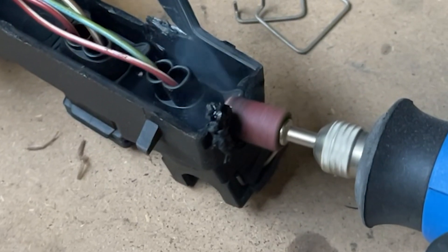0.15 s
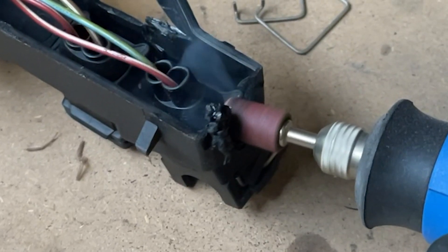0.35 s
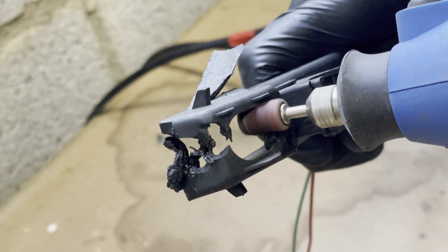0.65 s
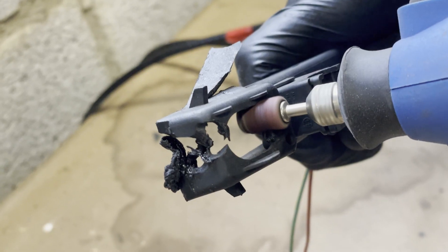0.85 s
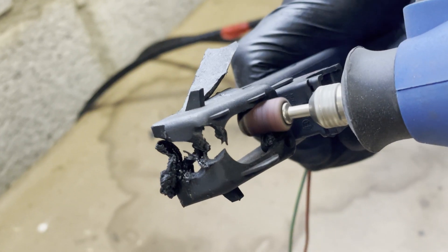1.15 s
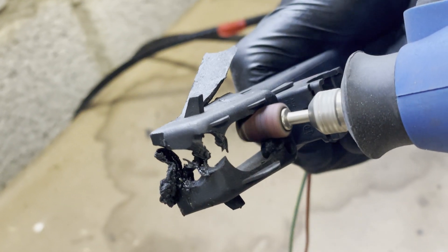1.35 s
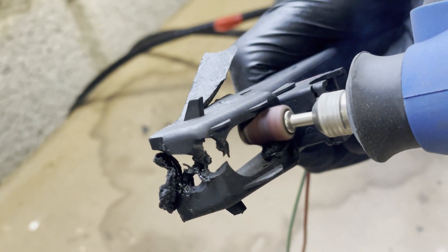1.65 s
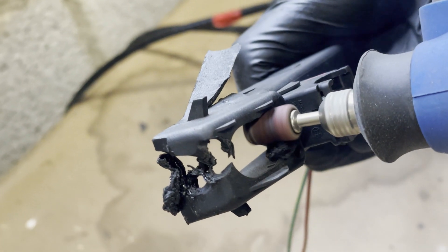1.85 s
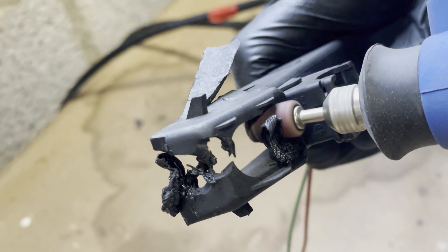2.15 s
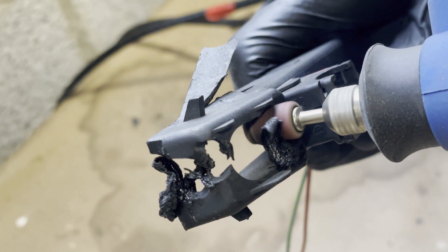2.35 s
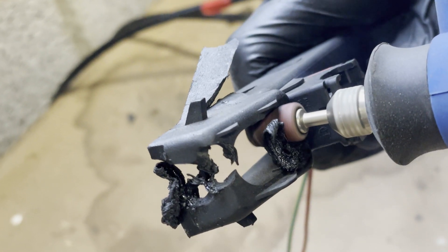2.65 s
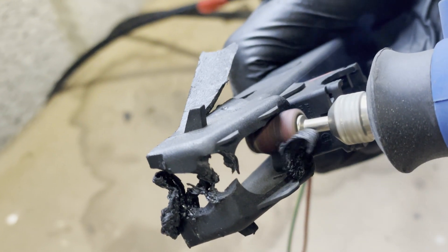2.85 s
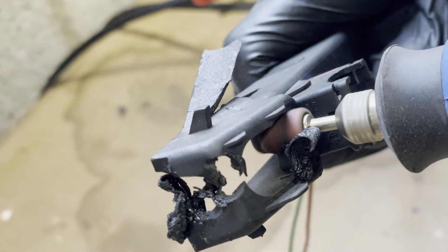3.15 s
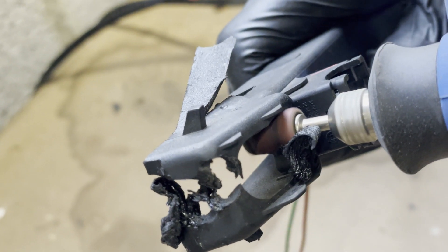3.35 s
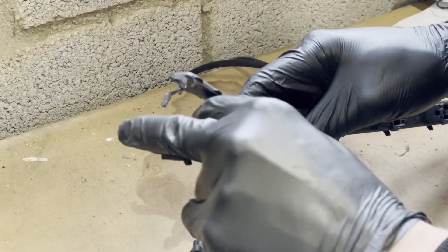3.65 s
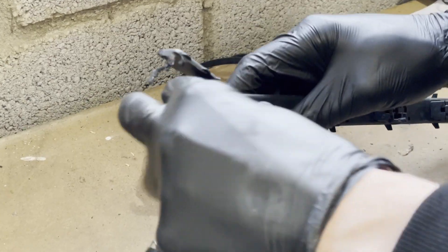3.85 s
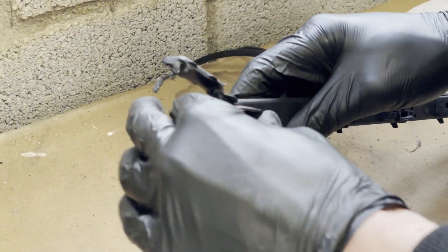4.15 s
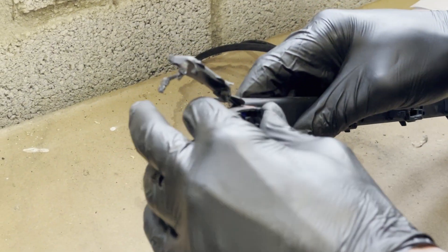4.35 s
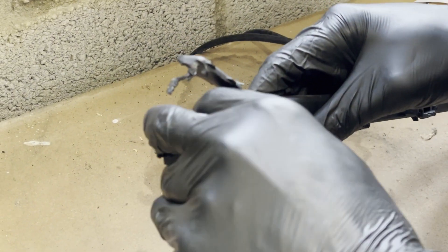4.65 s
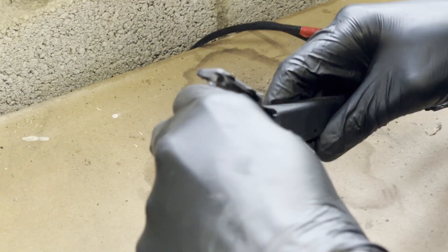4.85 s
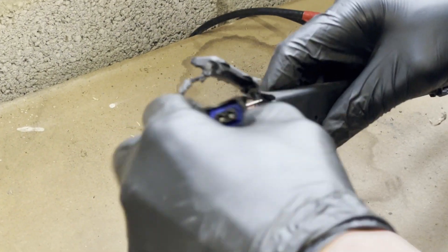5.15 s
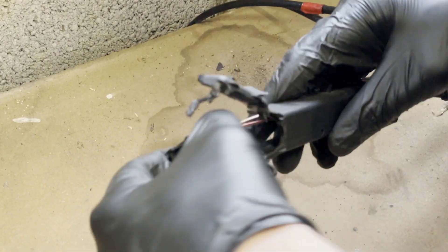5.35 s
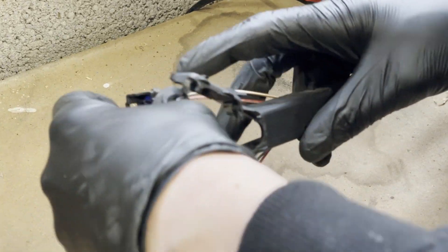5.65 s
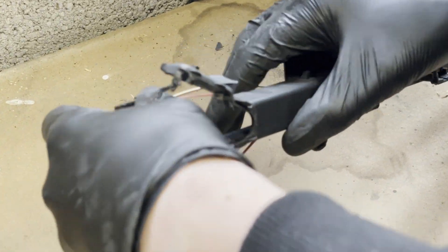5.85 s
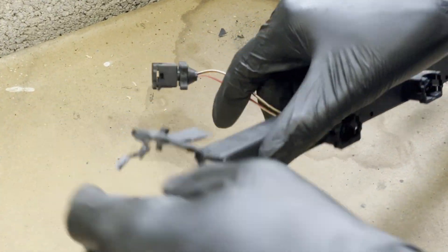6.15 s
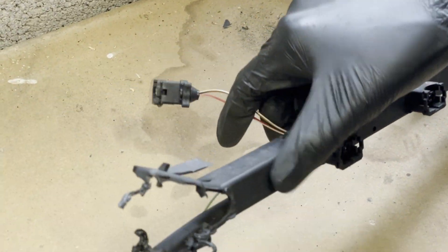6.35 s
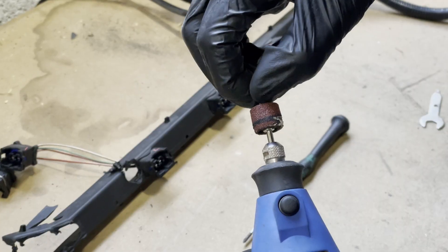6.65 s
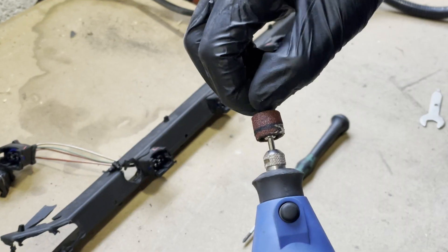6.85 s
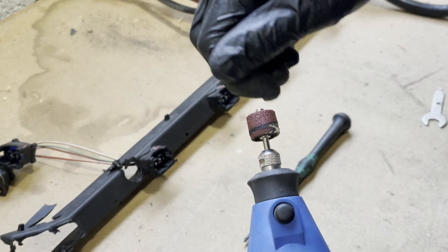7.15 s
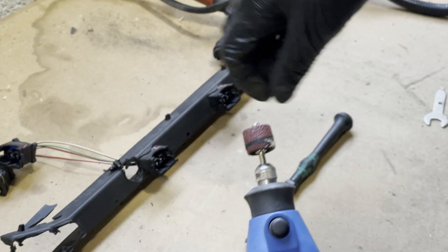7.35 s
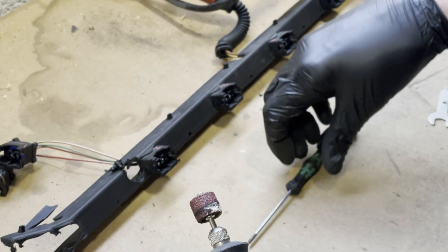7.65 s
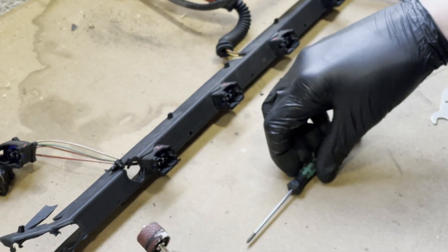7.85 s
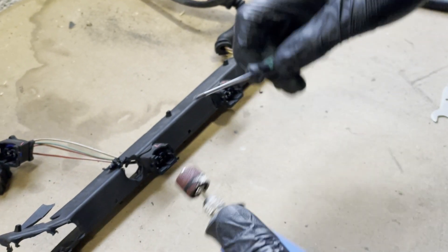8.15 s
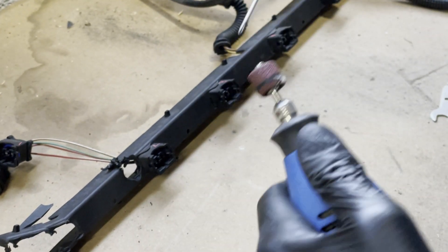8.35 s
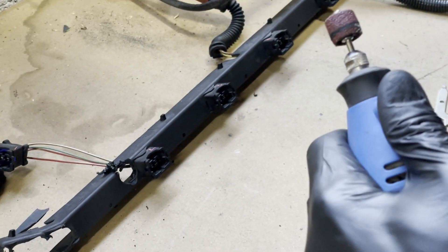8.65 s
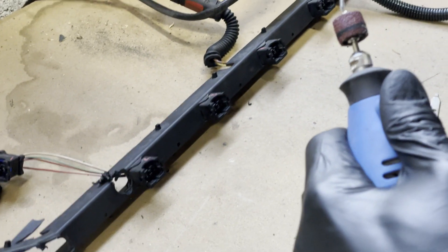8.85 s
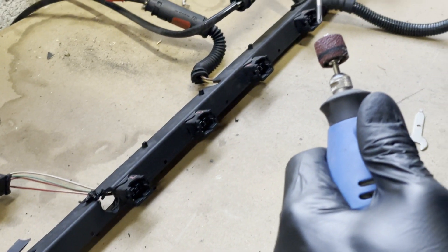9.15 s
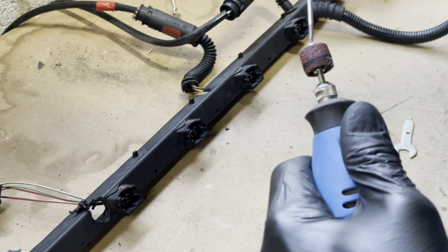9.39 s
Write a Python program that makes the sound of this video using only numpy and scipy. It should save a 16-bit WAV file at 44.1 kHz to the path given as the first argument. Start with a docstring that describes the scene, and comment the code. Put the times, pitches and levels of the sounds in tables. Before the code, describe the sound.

Close up, a small rotary tool grinds plastic: half a second of low hum and dull scuffing, then an abrupt switch to a loud, fast, raspy whine with hiss, chatter and thuds of air on the microphone. Its pitch sags slightly and recovers. It stops instantly, leaving quiet workshop hum, plastic snaps, bench knocks, glove rustle and scrapes, then a screwdriver rattling and dragging.

```python
"""A rotary tool with a sanding drum grinds a plastic housing on a workbench, close to the microphone. First the
tool runs slowly, in shaft orders and dull grit noise; then the scene changes to a fast whine of shaft and
bearing tones, with rasp, chatter and buffeting cooling air; its pitch sags under pressure. The whine ends at
once. Then gloved hands rub (grain noise), click (cracks and ringing modes) and knock (bursts in the bench's
bands) the plastic parts and pick up a screwdriver in a quiet workshop of low noise and hum."""
import sys
import numpy as np
from scipy import signal
from scipy.fft import rfft, irfft
from scipy.io import wavfile
from scipy.ndimage import uniform_filter1d

SR = 44100
rng = np.random.default_rng(int(sys.argv[2]) if len(sys.argv) > 2 else 0)


def bounce(signal):
    """Save signal as a 16-bit WAV file at the path given by the first command-line argument."""
    frames = np.transpose(np.atleast_2d(signal))
    limited = np.clip(frames, -1, 1)
    pcm = np.round(limited * 32767).astype(np.int16)
    wavfile.write(sys.argv[1], SR, pcm)


N = 419832
TIME = np.arange(N) / SR
FREQ = np.maximum(np.arange(N // 2 + 1) * SR / N, 1)
LEFT_RIGHT = np.array([[1], [-1]])  # opposite signs at the two ports

FAST_START_S, FAST_END_S = .476, 3.549
CAGE = .308  # turns of the ball bearing's cage per turn of the shaft

# Shaft speed, sagging as the drum is pressed in. Each row: time in seconds, speed in Hz.
SPEED = [(.476, 318.7), (.75, 313.6), (1.2, 307.9), (1.7, 298.7), (2.0, 296), (2.45, 302.1), (2.95, 315.1),
         (3.3, 314.4), (3.55, 309.5)]
# Grit and air noise before the contact changes it. Each row: frequency in Hz, level in dB per Hz.
GRIND = [(40, -104), (250, -89.5), (450, -78.5), (800, -73.5), (1100, -66.5), (2200, -72.5), (4250, -75.5),
         (5500, -72), (7500, -65.5), (12000, -71.5), (15000, -70.5), (16000, -94.5)]
# Resonances of the plastic housing. Each row: centre in Hz, width in Hz, lift in dB.
HOUSING = [(1300, 430, 2.5), (1730, 140, 7), (2520, 270, 2), (3504, 920, 8), (4885, 420, 5), (6300, 250, 4)]


def undb(db):
    """Decibels to gain."""
    return 10 ** (np.asarray(db) / 20)


def unit(x):
    """Scale to rms 1."""
    return x / np.sqrt(np.mean(x ** 2))


def bumps(hz, peaks):
    """Lift in dB from resonances."""
    return sum(lift / (1 + (2 * (hz - centre) / width) ** 4) for centre, width, lift in peaks)


def shape(hz, points, peaks=()):
    """Level in dB of a spectrum drawn over log frequency, with resonant bumps."""
    f, db = np.transpose(points)
    return np.interp(np.log(hz), np.log(f), db) + bumps(hz, peaks)


def through(x, gain):
    """Pass a sound through a gain for each frequency in FREQ."""
    return irfft(rfft(x) * gain, N)


def colour(x, points, peaks=()):
    """Give white noise of rms 1 a spectrum in dB per Hz."""
    return through(x, undb(shape(FREQ, points, peaks))) * np.sqrt(SR / 2)


def butter(x, hz, kind, order=2):
    """Causal low-, high- or band-pass."""
    edges = np.clip(hz, 10, .45 * SR)
    return signal.sosfilt(signal.butter(order, edges, kind, fs=SR, output="sos"), x)


def white():
    """Gaussian noise."""
    return rng.standard_normal(N)


def walk(rate):
    """Smooth random wandering of rms 1, with a fresh draw about rate times a second."""
    k = max(int(SR / rate), 2)
    steps = np.repeat(rng.standard_normal(N // k + 1), k)
    return unit(uniform_filter1d(uniform_filter1d(steps, k), k)[:N])


def grains(rate, spread_db):
    """Random tiny impacts of uneven size, rate a second on average, rms 1."""
    struck = rng.random(N) < rate / SR
    size = undb(spread_db * np.minimum(rng.exponential(size=N), 5))
    return unit(white() * struck * size)


def between(start, end):
    """1 from start to end, with edges of 2 ms."""
    return np.clip(np.minimum(TIME - start, end - TIME) / .002 + .5, 0, 1)


def swell(s, half_s):
    """A bell-shaped rise and fall of power around time s."""
    return np.exp(-((TIME - s) / half_s) ** 2)


def strokes_power(rows):
    """Summed power of bell-shaped strokes, from rows of time, half length and level in dB."""
    return sum(undb(db) ** 2 * swell(s, half_s) for s, half_s, db in rows)


def bites(turn, sharpness):
    """A gain that peaks once in every turn, rms 1."""
    return unit(np.exp(sharpness * np.cos(turn)))


def fade(t, t60):
    """Exponential ring-down by 60 dB in t60 seconds."""
    return np.exp(-np.log(1000) * t / max(t60, .003))


def excerpt(noise, length):
    """A randomly placed stretch of a noise."""
    i = rng.integers(0, N - length)
    return noise[i:i + length]


def add(out, s, sound):
    """Mix a sound in at time s."""
    i = int(s * SR)
    out[i:i + len(sound)] += sound[:N - i]


def ports(x, phase, diffuse_db, band_db, tail_t60=0.21):
    """Two close ports hear a source out of phase; a diffuse part differs, with an extra band at 2.4 to 12.5 kHz."""
    lead = np.interp(FREQ, *np.transpose(phase))
    direct = through(x, np.exp(.5j * lead * LEFT_RIGHT))
    tail = rng.standard_normal(SR // 2) * fade(TIME[:SR // 2], tail_t60)
    diffuse = signal.fftconvolve(x, tail / np.linalg.norm(tail))[:N]
    extra_band = butter(diffuse, [2400, 12500], "band")
    unlike = undb(diffuse_db) * diffuse + undb(band_db) * extra_band
    return direct + unlike * LEFT_RIGHT


def workshop(side_db):
    """Low room noise and a wavering hum, mostly alike at both ports, from when the tool stops."""
    # Background noise. Each row: frequency in Hz, level in dB per Hz.
    room_noise = [(25, -88), (50, -80), (68, -79), (90, -75), (200, -78.5), (380, -81.5), (600, -82),
                  (1000, -91.5), (1600, -97.5), (2350, -99), (3000, -104), (4500, -108), (6500, -119),
                  (15000, -133)]
    # Steady hum before its wavering. Each row: frequency in Hz, level in dB rms.
    hum_lines = [(70.7, -54), (142, -62), (213, -60), (321, -63), (463, -69.5)]
    hum = 0
    for hz, db in hum_lines:
        level = np.sqrt(2) * undb(db + 2.0 * walk(4.3))
        hum = hum + level * np.sin(2 * np.pi * hz * TIME + .5 * walk(6.4))
    mid = colour(white(), room_noise) * undb(0.11 * walk(3.4)) + hum
    side = colour(white(), room_noise) * undb(side_db)
    return (mid + side * LEFT_RIGHT) * between(FAST_END_S, 99)


def rubbing():
    """Gloves, plastic and the screwdriver slide in strokes of dense stick-slip grains, and stir faintly between."""
    # Plastic slides over plastic. Each row: time in seconds, half length in seconds, level in dB.
    scrape_strokes = [(4.245, .012, -94), (4.807, 0.054, -87.5), (5.176, 0.023, -84.5),
                      (5.53, 0.022, -86.5), (5.94, 0.032, -93), (6.055, 0.021, -87.5),
                      (6.131, 0.025, -86.5), (6.17, 0.018, -86)]
    # The screwdriver is dragged over the bench. Each row: time in seconds, half length in seconds, level in dB.
    drag_strokes = [(7.663, .035, -87.5), (7.707, 0.023, -81.5), (8.076, 0.074, -96), (8.198, 0.0095, -88)]
    # A glove shifts its grip. Each row: time in seconds, level in dB.
    grip_shifts = [(3.9, -95), (6.385, -91.5), (7.124, -102)]
    # The hands are busy and rub at random. Each row: start in seconds, end in seconds, level in dB.
    handling = [(3.582, 6.53, -103.5), (7.46, 8.58, -102)]
    # Colour of scraping. Each row: frequency in Hz, relative level in dB.
    scrape_colour = [(200, -24.5), (1200, -8.5), (2600, -5), (4500, -9.5), (7000, -10.5), (10000, -10),
                     (16000, -39)]
    # Colour of the gloves' rustle. Each row: frequency in Hz, relative level in dB.
    rustle_colour = [(500, -29), (3000, -15.5), (7000, -9), (13000, -6), (16000, -10)]
    # Wall and ribs of the housing under a scratch. Each row: centre in Hz, width in Hz, lift in dB.
    scratch_rings = [(3180, 160, 4.5), (4200, 119.5, 7.5), (4630, 100, 6.5), (5350, 130, 6.5),
                     (7050, 260, -1)]
    # The sliding screwdriver's shank. Each row: centre in Hz, width in Hz, lift in dB.
    shank_rings = [(1520, 98, 8), (2070, 100, 10), (5160, 120, -1), (6650, 120, 5)]
    grip_half_s, handling_fade_s = 0.037, 0.11
    stroke_rustle_db, fidget_rustle_db = -2.5, -3  # the gloves rustle along with what they move

    # all of these are powers
    busy = sum(undb(db) ** 2 * between(start, end) for start, end, db in handling)
    busy = np.abs(uniform_filter1d(busy, int(handling_fade_s * SR)))
    fidget = busy * undb(5.0 * walk(12)) ** 2
    strokes, drags = strokes_power(scrape_strokes), strokes_power(drag_strokes)
    grips = strokes_power([(s, grip_half_s, db) for s, db in grip_shifts])
    rustle = grips + (strokes + drags) * undb(stroke_rustle_db) ** 2 + fidget * undb(fidget_rustle_db) ** 2

    plastic_slips = unit(grains(rate=1500, spread_db=4.0) + 1.2 * white())
    steel_slips = unit(grains(rate=1600, spread_db=4.0) + 0.88 * white())
    crinkles = unit(grains(rate=3200, spread_db=3.5) + 2.1 * white())
    catching = undb(3 * walk(110))  # uneven friction
    plastic = colour(plastic_slips * catching * np.sqrt(strokes + fidget), scrape_colour, scratch_rings)
    steel = colour(steel_slips * catching * np.sqrt(drags), scrape_colour, shank_rings)
    gloves = catching * np.sqrt(rustle) * colour(crinkles, rustle_colour)
    return plastic + steel + gloves


def screwdriver():
    """The handle's modes ring briefly as the screwdriver tips off the bench."""
    # Each row: time in seconds, level in dB.
    rattles = [(7.581, -42.5), (7.594, -47)]
    # Modes of the handle. Each row: frequency in Hz, relative level in dB, t60 in seconds.
    handle_modes = [(950, 3.5, 0.058), (1055, 1, 0.057), (2050, -13, 0.067)]
    out, t = np.zeros(N), TIME[:SR // 2]
    for s, db in rattles:
        for hz, mode_db, t60 in handle_modes:
            tone = np.sin(2 * np.pi * hz * rng.normal(1, 0.025) * t)
            add(out, s, undb(db + mode_db) * fade(t, t60) * tone)
    return out


def knocks():
    """Parts bump the bench; soft contacts stir only its low modes, which take a cycle to build."""
    # Each row: time in seconds, relative strength in dB, contact cut-off in Hz.
    bench_knocks = [(3.905, -29, 160), (4.399, -49, 1500), (4.714, -22, 1500), (4.745, -28, 252),
                    (5.51, -31, 220), (6.039, -39, 300), (6.32, -31, 1400), (6.497, -36.5, 1505),
                    (7.56, -32.5, 395)]
    # The bench's broad modes. Each row: frequency in Hz, relative level in dB, t60 in seconds.
    bench_modes = [(66, -0.5, 0.47), (138.6, -6, 0.38), (208, -4, 0.21), (326, -10, 0.32),
                   (406, -5.5, 0.33), (556, -12, 0.068), (780, -4, 0.14), (1120, -24, 0.052)]
    blow_db = -8  # level of all knocks
    out, t = np.zeros(N), TIME[:SR // 2]
    for hz, mode_db, t60 in bench_modes:
        band = unit(butter(white(), [hz * 0.82, hz * 1.22], "band"))
        envelope = fade(t, t60) * (1 - np.exp(-t * hz))
        for s, db, soft_hz in bench_knocks:
            force = undb(db + mode_db + blow_db) / np.sqrt(1 + (hz / soft_hz) ** 4)
            add(out, s, force * excerpt(band, len(t)) * envelope)
    return out


def clicks():
    """Each snap is a short crack, the ring of the plastic and a diffuse tail from the bench and walls."""
    # Each row: time in seconds, relative strength in dB, treble gain in dB, ring against crack in dB.
    snaps = [(3.9807, -29.5, -5, -20), (4.399, -16.5, 8, -19), (4.561, -40, 12, -14),
             (4.6772, -33, 22, -26), (4.7125, -18, -18, -6), (4.719, -16.5, -8, -10),
             (4.733, -20.5, -3, -16), (4.77, -27.5, 2, -12), (4.8723, -34.5, -15, -11),
             (4.878, -30.5, -14, -8), (5.286, -35.5, 0, -13), (5.3025, -31, 7, -12), (5.505, -32.5, 0, -6),
             (6.001, -38, 11, -18), (6.0348, -33, 1, -6), (7.5917, -31.5, -3, -19), (7.945, -36, -19, -9),
             (8.129, -40, -1, -15), (8.327, -34.5, -22, -14), (8.919, -39.5, 19, -20)]
    # What the plastic rings with. Each row: frequency in Hz, relative level in dB, longest t60 in seconds.
    plastic_modes = [(1230, -15, .075), (1930, -7, 0.056), (2380, 0, 0.074), (2690, 2.5, 0.027),
                     (2830, -3.5, .13), (3180, -3, 0.093), (4610, -8.5, .066), (4870, -8, 0.06),
                     (6939, -25, .06)]
    # Colour of a crack. Each row: frequency in Hz, relative level in dB.
    crack_colour = [(100, 2), (700, 0), (1500, -6.5), (2800, 1.5), (4300, -6.5), (7000, -3.5),
                    (10000, -5.5), (15000, -2.5)]
    # Broad resonances of the hollow plastic parts. Each row: centre in Hz, width in Hz, lift in dB.
    hollow_parts = [(1980, 380, 3), (2680, 500, 0), (4300, 300, 2), (5380, 300, 2)]
    # a harder click rings longer: t60 at a reference strength, and the dB more that double it
    ref_t60_s, ref_db, doubling_db = 0.061, -27, 26
    tail_db, strike_db = -10, -10  # tail against crack; level of all clicks

    out, t = np.zeros(N), TIME[:SR // 3]
    noise = unit(colour(white(), crack_colour, hollow_parts))
    for s, db, treble_db, ring_db in snaps:
        t60 = ref_t60_s * 2 ** ((db - ref_db) / doubling_db)
        crack_fade = fade(t, 0.39 * t60) + undb(tail_db) * fade(t, t60 * 1.4)
        snap = excerpt(noise, len(t)) * crack_fade
        for hz, mode_db, decay in plastic_modes:
            tone = np.sin(2 * np.pi * hz * rng.normal(1, 0.011) * t)
            snap = snap + undb(mode_db + ring_db) * fade(t, min(decay, 2 * t60)) * tone
        dull = butter(snap, 6800, "low", order=1)
        snap = dull + undb(treble_db) * (snap - dull)
        onset_rms = np.sqrt(np.mean(snap[:SR // 300] ** 2))  # the strength counts over the first 3.3 ms
        add(out, s, undb(db + strike_db) * snap / onset_rms)
    return out


def slow_tool():
    """Unbalance hums in shaft orders; the drum scuffs partly the same grit each turn, pulsing with shaft and cage."""
    # Levels of the shaft orders 1, 2, 3 .. in dB rms.
    order_levels = [-32.5, -55, -40.5, -61, -55, -68]
    # Slow grinding noise. Each row: frequency in Hz, level in dB per Hz.
    scuff_colour = [(30, -74.5), (150, -70), (400, -71), (800, -68), (1150, -76), (2200, -76.5),
                    (2800, -74), (3400, -77), (4650, -84.5), (5000, -128), (16000, -140)]
    slow_hz = 81  # mean shaft rate
    turn = 2 * np.pi * np.cumsum(slow_hz * (1 + 0.0012 * walk(12.0))) / SR
    hum = 0
    for k, db in enumerate(order_levels, 1):
        hum = hum + undb(db) * np.sqrt(2) * np.sin(k * turn + rng.uniform(0, 2 * np.pi))
    rim = white()[:int(SR / slow_hz)]  # grit once around the drum
    same_grit = rim[(turn / (2 * np.pi) % 1 * len(rim)).astype(int)]
    grit = grains(rate=8300, spread_db=-1.0) + 0.78 * same_grit
    scuff = unit(grit * (1 + 0.12 * np.cos(turn)) * bites(CAGE * turn, .4))
    return (hum + colour(scuff, scuff_colour)) * between(-1, FAST_START_S)


def cooling_air():
    """A restless draught on the microphone, with a thud of air whenever the vent points at it."""
    # The air sweeps over the microphone. Each row: time in seconds, half length in seconds, level in dB.
    gusts = [(0.495, .008, -40), (.685, 0.013, -34.5), (0.797, 0.011, -33.5), (.86, 0.028, -42.5),
             (1.382, .016, -37.5), (1.82, .018, -36.5), (1.875, .012, -34), (1.924, 0.012, -30),
             (2.31, 0.016, -36.5), (2.507, 0.081, -40.5), (2.643, 0.02, -34), (2.727, 0.011, -20),
             (2.835, .018, -31), (2.91, .014, -35.5), (2.962, 0.0082, -30), (3.043, 0.018, -31),
             (3.24, 0.018, -37)]
    # Colour of the thuds. Each row: frequency in Hz, relative level in dB.
    puff_colour = [(20, -45), (45, -0.5), (65, 4.5), (110, -3.5), (170, -13), (300, -18.5), (700, -49),
                   (2000, -69)]
    draught_db = -44 + 2.0 * walk(22)
    power = undb(draught_db) ** 2 + strokes_power(gusts)
    eddies = colour(white(), puff_colour)
    # level the eddies over 25 ms so that the power sets their strength
    return eddies * np.sqrt(power / uniform_filter1d(eddies ** 2, int(.025 * SR)))


def motor_tones(turn, rocking, fan_db, grind_db, hiss_db, load):
    """Shaft orders that throb with the cage, slipping bearing tones, and the buzz of the brushes; fast run only."""
    # Shaft orders 1, 2, 3 .. before their drive; the circling cage puts a sideband on each side.
    # Each row: line in dB, lower sideband in dB, upper sideband in dB.
    orders = [(-41, -78, -72), (-52, -59, -62), (-31.5, -46, -53), (-44, -49.5, -53.5), (-47.5, -52, -50),
              (-50.5, -42, -53), (-56, -53, -56.5), (-46, -62, -54), (-50.5, -54.5, -51), (-54, -51.5, -60),
              (-44.5, -56, -52.5), (-46.5, -50, -51.5)]
    # Bearing tones between the orders. Each row: multiple of the shaft rate, level in dB rms before shimmer.
    bearings = [(3.37, -47), (4.13, -48), (4.22, -48), (4.42, -57), (4.8, -51), (5.59, -47), (6.35, -44),
                (7.12, -56), (7.48, -47.5), (7.88, -53.5), (8.66, -44.5), (8.87, -63), (10.5, -52.5),
                (11.25, -53)]
    # Narrow resonances the lines glide through. Each row: centre in Hz, width in Hz, lift in dB.
    shell = [(1798, 45, 3.5), (1880, 49, 3), (2637, 60, 5.5), (5260, 69, -4.5)]
    slip, shimmer_db = .6, 2.5  # wandering of phase (radians) and level at full unrest
    chatter_pitch_db = 5.5  # growth of the sixth order, near the wall's mode, at full load
    upper_db, commutator_db = 18.0, 6  # upper orders over the grit's spectrum; extra for the bars

    span = slice(int(FAST_START_S * SR) - 100, int(FAST_END_S * SR) + 100)
    turn, load = turn[span], load[span]
    fan, grind, hiss = undb(fan_db[span]), undb(grind_db[span]), undb(hiss_db[span])
    cage = np.exp(1j * rocking[span])
    chance = walk(22)

    def line(phase, gain, unrest):
        """One tone whose level and phase wander by chance."""
        level, wander = excerpt(chance, len(turn)), excerpt(chance, len(turn))
        wave = np.exp(1j * (phase + unrest * slip * wander + rng.uniform(0, 2 * np.pi)))
        return np.sqrt(2) * undb(unrest * shimmer_db * level) * np.imag(gain * wave)

    # unbalance is steady; order 2 grows with the hiss, 3 with the fan's tone, 6 with the load
    drives = {1: 1, 2: hiss ** 2, 3: fan, 6: undb(chatter_pitch_db * load ** 2)}
    tones = 0
    for k, (db, lower_side_db, upper_side_db) in enumerate(orders, 1):
        throb = undb(db) + undb(lower_side_db) / cage + undb(upper_side_db) * cage
        tones = tones + drives.get(k, grind) * line(k * turn, throb, unrest=.15 if k in (1, 3) else 1)
    for multiple, db in bearings:
        tones = tones + line(multiple * turn, undb(db), unrest=.9)
    mean_hz = np.mean(SPEED, axis=0)[1]
    for k in range(len(orders) + 1, 51):
        # sixteen commutator bars lift every sixteenth order
        db = shape(k * mean_hz, GRIND, HOUSING) + upper_db + commutator_db * (k % 16 == 0)
        tones = tones + hiss * line(k * turn, undb(db), unrest=.8)
    out = np.zeros(N)
    out[span] = tones
    return through(out, undb(bumps(FREQ, shell)))


def fast_tool():
    """The motor sings while grit tears at the plastic, pulsing with each turn of the shaft and of the bearing cage."""
    # The fan's tone swells near the resonance of the vent. Each row: centre in Hz, width in Hz, lift in dB.
    vent = [(945.6, 69, 8)]
    # Modes of the plastic wall that chatter. Each row: centre in Hz, width in Hz, level in dB rms at full load.
    chatter_modes = [(1810, 290, -44), (3640, 250, -48.5)]
    hz = np.interp(TIME, *np.transpose(SPEED))
    fan_db = -5.5 + bumps(3 * hz, vent)  # the fan sounds at the third order
    # the drum slips to a lighter contact: less grinding, more hiss
    ease_s, ease_length_s = 2.72, .2
    easing = [ease_s - ease_length_s / 2, ease_s + ease_length_s / 2]
    grind_db = np.interp(TIME, easing, [0.5, -0.5])
    hiss_db = np.interp(TIME, easing, [0.04, 2.6])

    turn = 2 * np.pi * np.cumsum(hz * (1 + 0.00029 * walk(25))) / SR
    grit = unit(grains(rate=4500, spread_db=1.14) + 1.08 * white()) * (1 + 0.13 * np.cos(turn))
    noise = colour(grit, GRIND, HOUSING)
    low, body = (through(noise, 1 / (1 + (FREQ / edge_hz) ** 4)) for edge_hz in (2200, 4500))
    # the contact shifts, so the lower and upper rasp flutter each on their own
    rasp = low * undb(1.1 * walk(70)) + (body - low) * undb(1.1 * walk(65))
    # the harder the drum is pressed, the more the speed sags and the plastic wall chatters
    load = (hz.max() - hz) / np.ptp(hz)
    chatter = 0
    for centre, width, db in chatter_modes:
        band = butter(white(), [centre - width / 2, centre + width / 2], "band")
        chatter = chatter + load ** 2 * undb(db) * unit(band)
    # the drum rocks with the cage and bites once in each of its turns
    rocking = CAGE * turn + 0.28 * walk(18)
    biting = rasp * bites(rocking, .55) + chatter * bites(rocking, 2.2)
    hiss = (noise - body) * undb(hiss_db + .5 * walk(23.25))
    grinding = biting * undb(grind_db) + hiss
    tones = motor_tones(turn, rocking, fan_db, grind_db, hiss_db, load)
    return (grinding + tones + cooling_air()) * between(FAST_START_S, FAST_END_S)


def scene():
    """The tool straight ahead, then the hands and the room with their bass a little to the right."""
    # Phase by which the left port leads, for the fast tool and hands. Each row: frequency in Hz, radians.
    port_phase = [(0, 0), (2240, 0), (3270, .6), (4480, 0), (5000, .7), (5430, -.1), (5770, -1.6),
                  (6890, -.6), (7490, -2.2), (8010, -2.3), (8700, -3.14), (9300, -3.7), (13200, -6.28),
                  (16000, -6.3)]
    # The same from where the tool runs slowly. Each row: frequency in Hz, radians.
    slow_port_phase = [(0, 0), (900, .6), (1300, .5), (1450, -1.3), (1800, -1.1), (2180, -3.14),
                       (3400, -6.28), (3800, -6.28), (4800, -9.4)]
    # The bass lies to the right. Each row: frequency in Hz, left minus right in dB.
    bass_balance = [(100, -1.5), (380, -1.3), (700, 0)]
    handled = clicks() + knocks() + screwdriver() + rubbing()
    hands = ports(handled, port_phase, diffuse_db=-19.5, band_db=-21.5) + workshop(side_db=-8.5)
    hands = through(hands, undb(shape(FREQ, bass_balance) * LEFT_RIGHT / 2))
    slow = ports(slow_tool(), slow_port_phase, diffuse_db=-15, band_db=-26)
    fast = ports(fast_tool(), port_phase, diffuse_db=-19.5, band_db=-23.5)
    return slow + fast + hands


def record(dry):
    """The recorder cuts the top steeply above 15.8 kHz."""
    return signal.sosfilt(signal.ellip(10, .2, 80, 15800, fs=SR, output="sos"), dry)


dry = scene()
out = record(dry)
bounce(out)
```